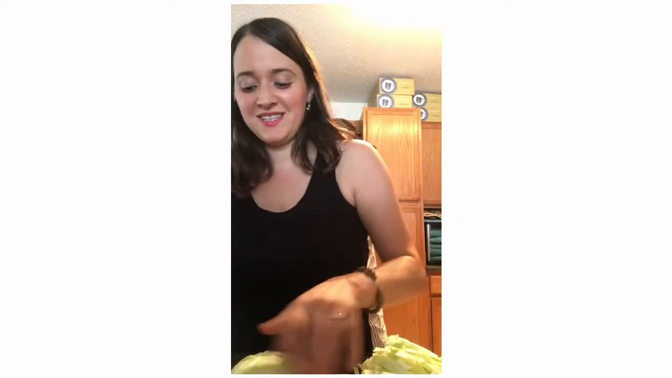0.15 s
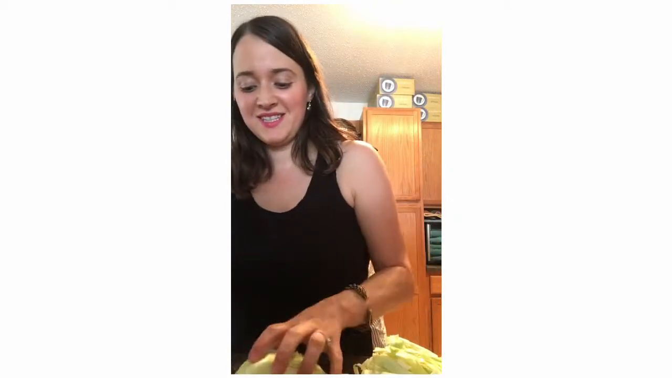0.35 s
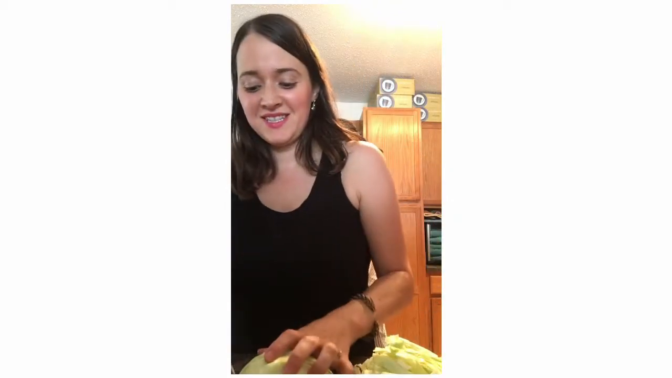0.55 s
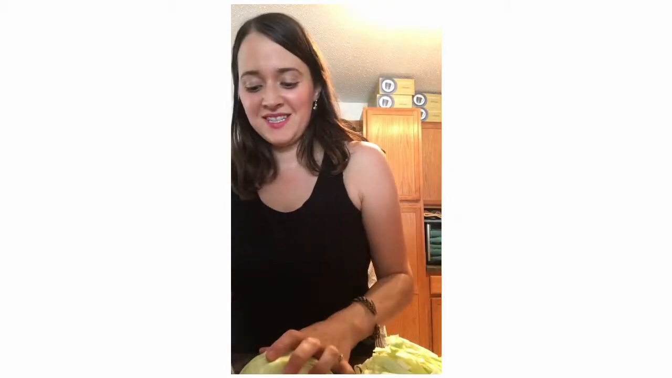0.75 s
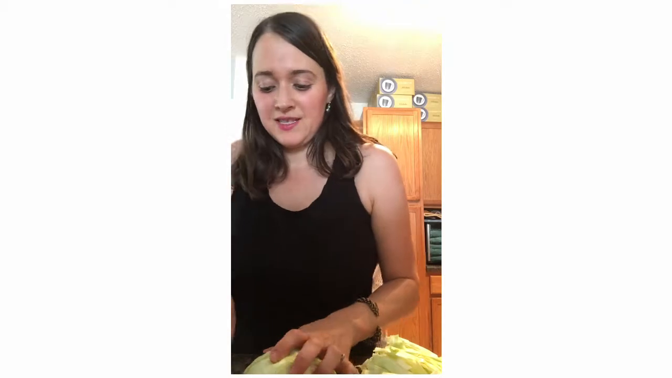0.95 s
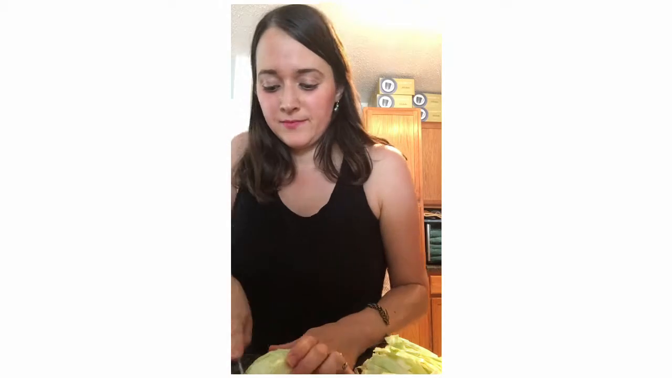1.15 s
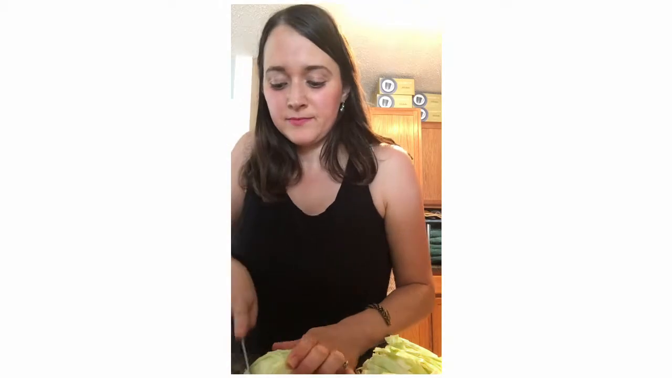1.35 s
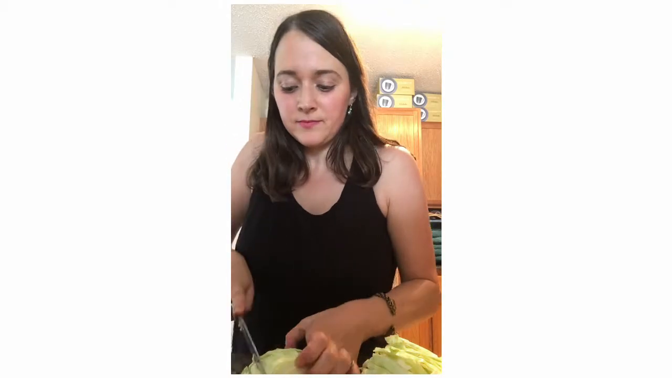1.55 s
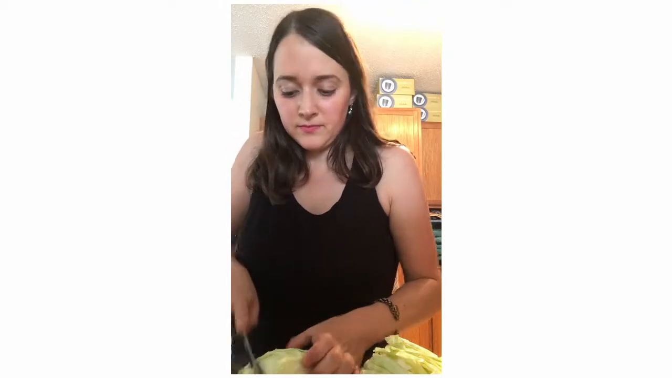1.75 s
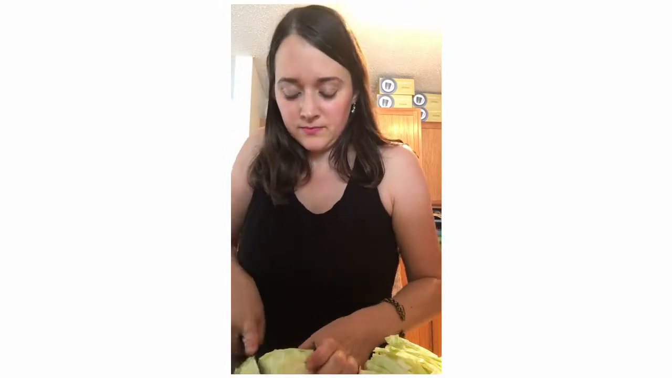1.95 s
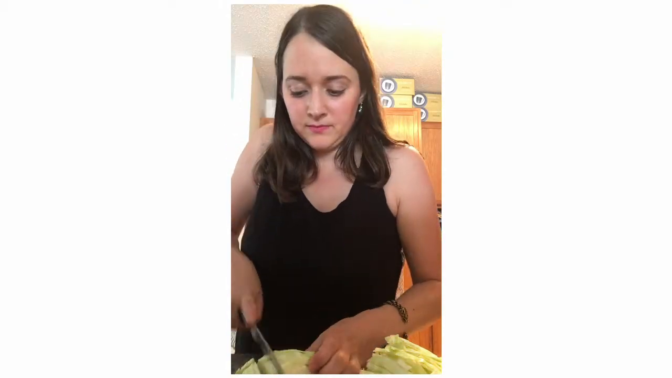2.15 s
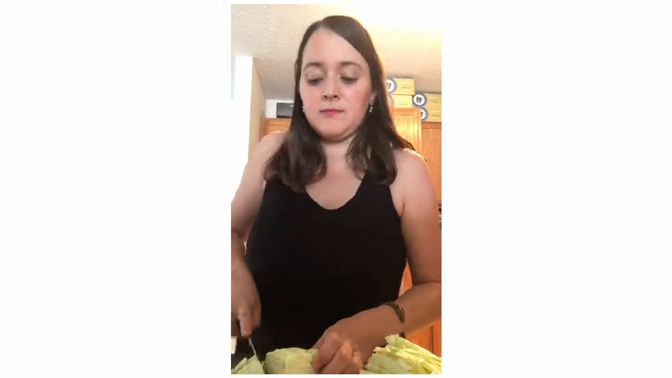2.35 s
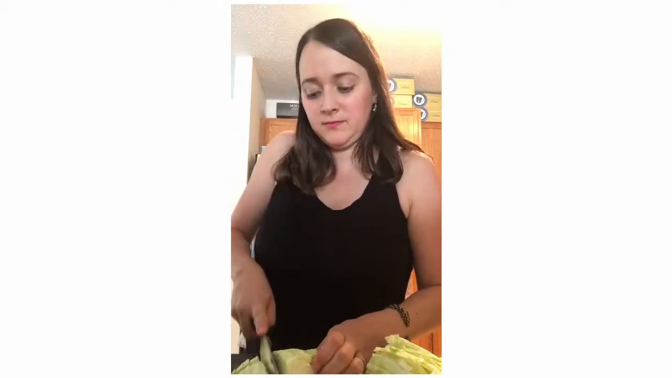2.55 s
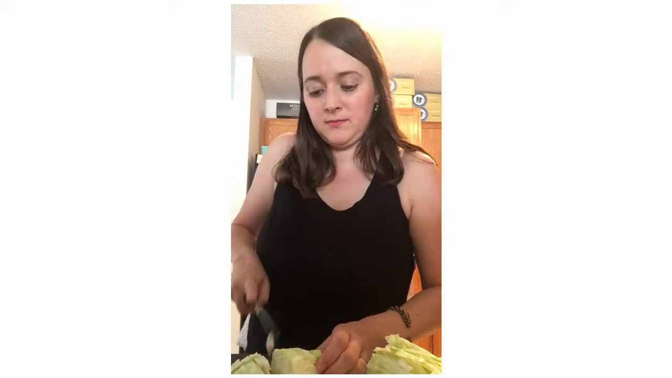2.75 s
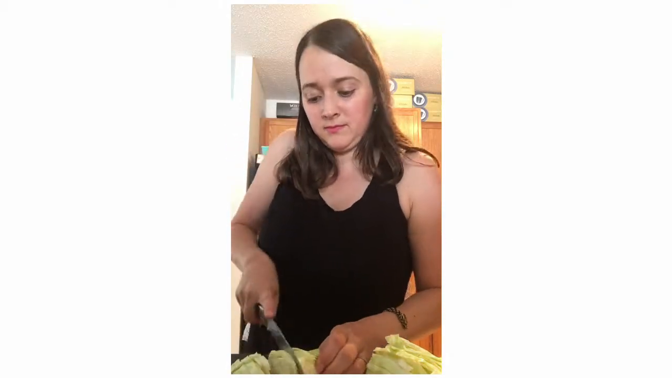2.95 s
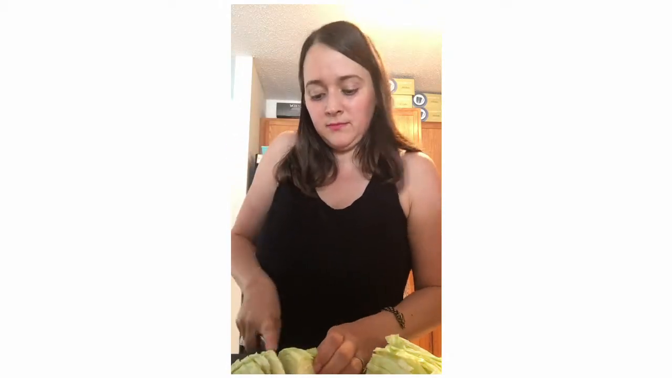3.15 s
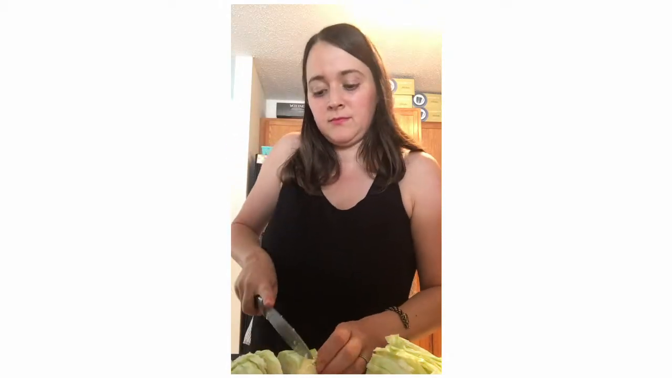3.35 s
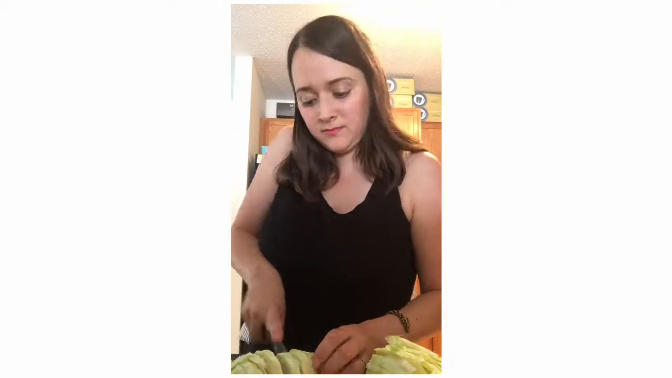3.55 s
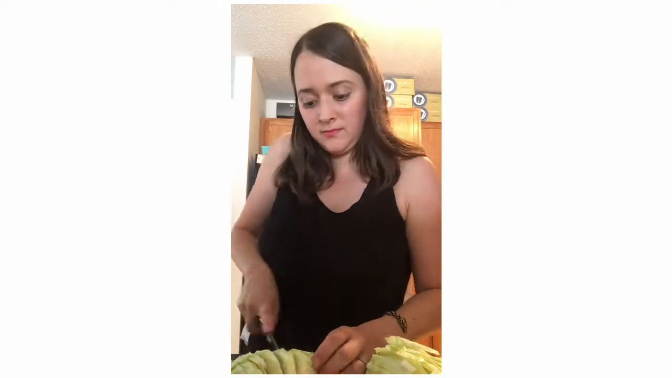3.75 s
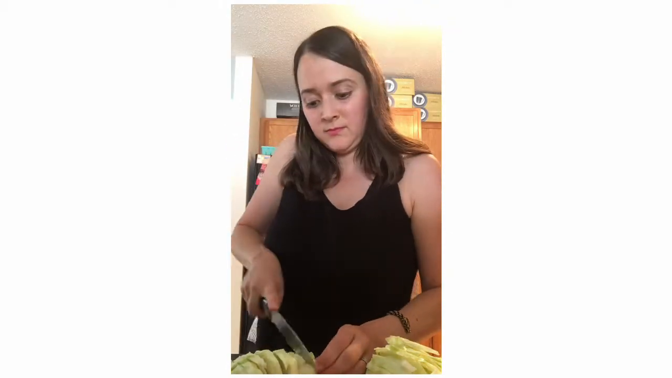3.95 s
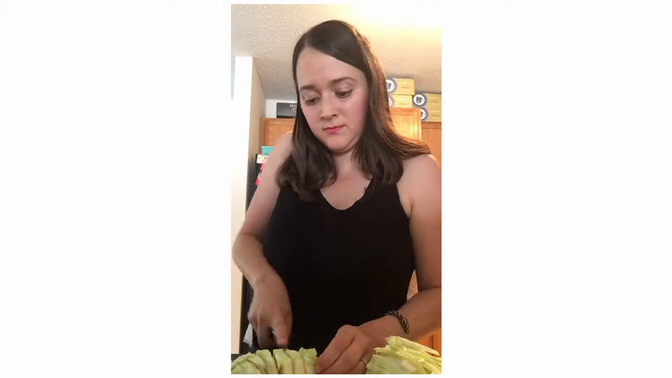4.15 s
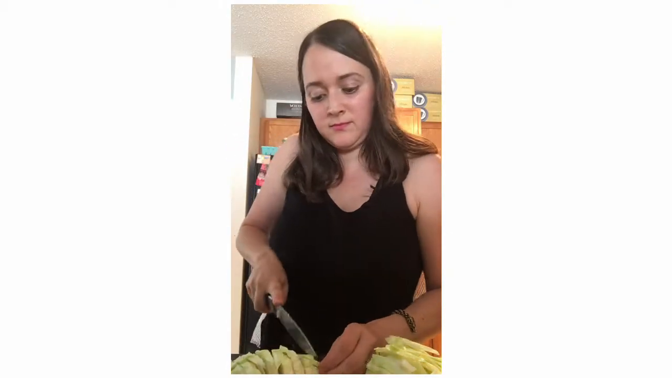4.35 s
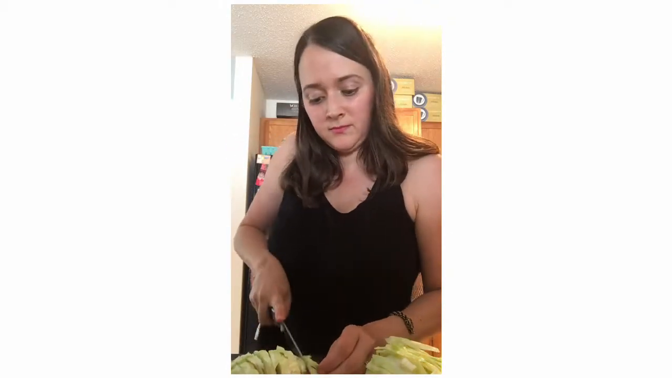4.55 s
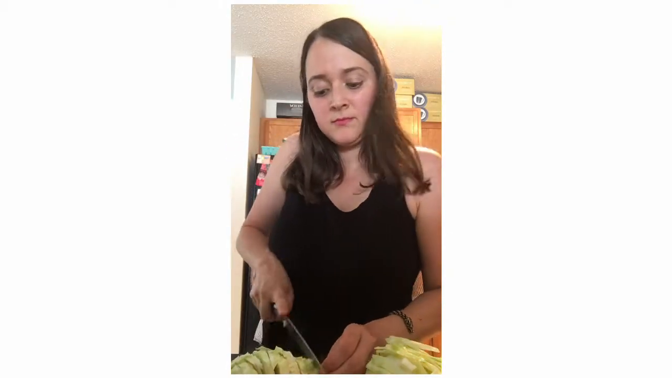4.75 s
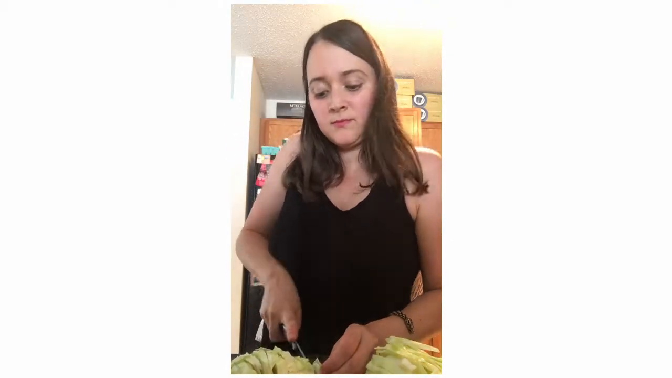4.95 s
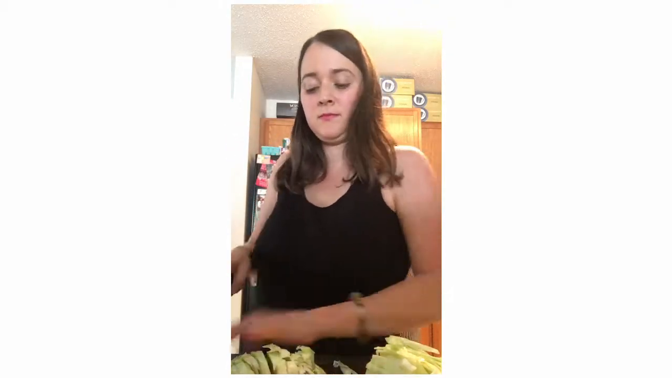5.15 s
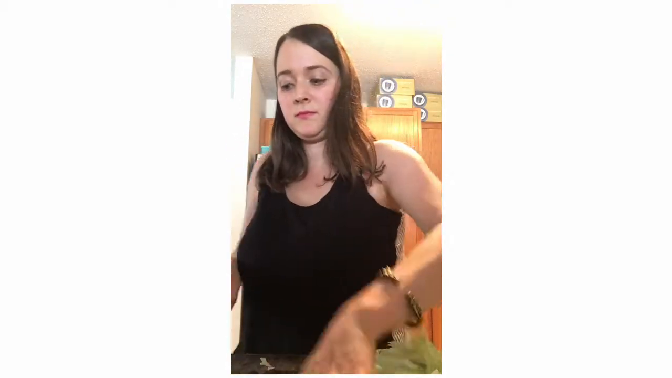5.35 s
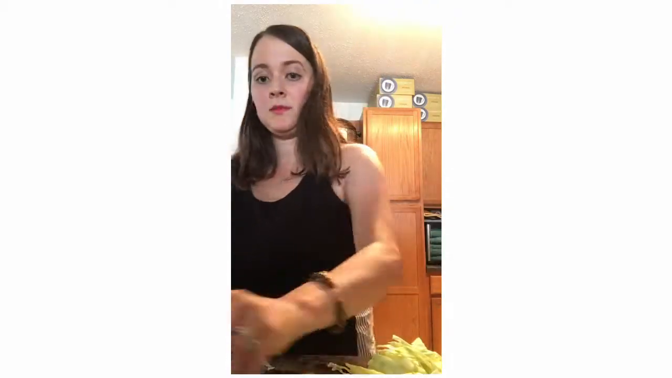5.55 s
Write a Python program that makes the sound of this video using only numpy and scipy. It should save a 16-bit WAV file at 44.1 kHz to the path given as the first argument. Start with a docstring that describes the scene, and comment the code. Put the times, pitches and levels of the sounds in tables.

```python
"""A hand settles a cabbage in a small kitchen, over a bass-heavy room noise that soon gives way to another.
Then a chef's knife slices on a wooden board: grains of noise make the leaves tear with a crunch,
and struck resonances make the blade crack on the board, which rocks on the counter.
At last the knife is laid flat and a hand sweeps the shreds aside with a noisy swish."""
import sys
import numpy as np
from scipy import signal
from scipy.fft import rfft, irfft
from scipy.io import wavfile

SR = 44100
rng = np.random.default_rng(int(sys.argv[2]) if len(sys.argv) > 2 else 0)


def dump(signal):
    """Clip the signal to [-1, 1] and save it as 16-bit WAV at the path in sys.argv[1]."""
    limited = np.clip(np.atleast_2d(signal).T, -1, 1)
    pcm = np.round(limited * 32767).astype(np.int16)
    wavfile.write(sys.argv[1], SR, pcm)


N = 247709

# All level_db columns are relative: the functions add further gains. t60_s is the time to fall 60 dB.
# In the tables of spectra, level_db is per Hz and gives only the shape.

# Room noise before and after ROOM_SWITCH_S: pitch_hz, level_db
EARLY_AIR = [(53, -21), (90, -16), (147, -5), (320, -4.5), (604, -20), (741, -20), (2330, -30), (4050, -36),
             (12000, -50.5), (15600, -58), (22000, -120)]
AIR = [(12, -63.5), (20, -22.5), (60, -40), (168, 2), (262, -10), (357, -1.5), (422, -5.5), (718, -3.5),
       (780, -7.5), (976, -7.5), (1480, -14), (1710, -21), (2750, -21), (12400, -37.5), (16000, -37)]
EARLY_AIR_DB, AIR_DB = -55, -54.5
ROOM_SWITCH_S = 0.74  # start of a short crossfade
# Narrow hum bands of an appliance: pitch_hz, width_hz, level_db
HUM_BANDS = [(186.4, 28, 0.5), (360, 14, -4), (530, 12, -7), (597, 12, -7), (717, 25, -4), (987, 28, -2.5)]
HUM_DB = -62

# Boom of the cabinet under the hand: time_s, level_db
BOOM = [(0.0, -38), (0.05, -55), (0.085, -56), (0.14, -44), (0.165, -50.5), (0.32, -54), (0.366, -46),
        (0.45, -59.5), (0.73, -56.5)]
# Palm pressing on the counter: start_s, level_db
PRESSES = [(0.107, -37), (0.123, -38), (0.338, -45), (0.355, -45)]
# Rings of the cabinet: pitch_hz, level_db, t60_s
CABINET_RINGS = [(64.3, -0.5, 0.24), (131, -14, 0.064)]
# Skin rubbing on leaves: start_s, hold_s, level_db, fall_30db_s (at least 0.003 s is used)
RUBS = [(0.0, 0.018, -48, 0.05), (0.068, 0.036, -53.5, 0.06), (0.31, .002, -66.5, 0.04),
        (0.382, 0.026, -61, 0.1), (0.435, 0.017, -67, -0.06), (0.463, 0.25, -75.5, -7)]
RUB_RISE_S = 0.063
# Spectrum of the rubbing: pitch_hz, level_db
RUB_SPECTRUM = [(470, -62), (800, -30), (1150, 2), (1340, -7), (1560, -4.5), (4250, -7.5), (9000, -24),
                (11700, -36), (19800, -120)]

# Thin faint tones: start_s, length_s, pitch_hz, level_db
TONES = [(2.314, 0.16, 1815, -64.5), (4.32, 0.046, 11050, -69), (5.195, 0.004, 4030, -52.5),
         (5.487, 0.021, 2100, -61.5)]

# Cut leaves shift and settle: start_s, hold_s, level_db, fall_30db_s (at least 0.003 s is used)
RUSTLES = [(0.752, .002, -66.5, 0.5), (0.9, 0.0055, -49.5, 0.1), (1.034, 0.0016, -62.5, 0.06),
           (1.178, 0.0042, -44, 0.06), (1.219, 0.004, -46, 0.1), (1.282, 0.05, -71, 0),
           (1.4, .005, -43, 0.14), (1.564, .002, -68, 0.5), (1.732, 0.037, -53, 0.15),
           (1.957, 0.0041, -40.5, 0.15), (2.107, 0.0017, -60, 0.3), (2.205, 0.009, -55.5, 0.2),
           (2.293, 0.069, -49.5, 0), (2.381, 0.0028, -55, 0.13), (2.457, .01, -58, 0.16),
           (2.578, 0.054, -50, 0), (2.698, .01, -59, -0.04), (2.72, .005, -48.5, .13),
           (2.786, .002, -53, -0.14), (2.833, .002, -62, 0.6), (2.961, 0.043, -51, 0.03),
           (3.015, .01, -72, 0.8), (3.075, 0.02, -54.5, 0.13), (3.1, 0.023, -58, 0.16),
           (3.212, 0.0054, -46, 0.1), (3.327, .002, -72, 1.5), (3.601, .005, -49.5, 0.1),
           (3.646, .01, -54.5, 0.27), (3.769, 0.036, -52.5, 0.09), (3.925, 0.0025, -63, 0.5),
           (4.062, 0.037, -55.5, 0.12), (4.181, 0.089, -55, 0), (4.33, .002, -76, 0.5),
           (4.53, 0.048, -57.5, -0.34), (4.574, 0.008, -53, -0.27), (4.662, 0.027, -53.5, 0.1),
           (4.788, .002, -65, 0.05), (4.916, 0.073, -57, -0.1), (4.997, 0.0042, -54.5, 0.17),
           (5.04, 0.0046, -62.5, 0.6), (5.508, .004, -51, 0.25), (5.54, .01, -57, 0.2)]
RUSTLE_RISE_S = 0.0091
LEAD_S, LEAD_DB = 0.01, -12.5  # rustle growing up to each stroke; level against the entry crunch
# Spectrum of rustling leaves: pitch_hz, level_db
LEAF_SPECTRUM = [(1180, -30.5), (2000, -4.5), (3260, -7), (9250, -3), (10000, -4), (13900, -6.5),
                 (16000, -5)]

# Board rocking on the counter between the chops: start_s, level_db
BUMPS = [(0.906, -24), (1.044, -34), (1.133, -29), (1.196, -28.5), (1.368, -26.5), (1.479, -39),
         (1.569, -32.5), (1.646, -23), (1.84, -34), (1.92, -30.5), (2.01, -29), (2.116, -28),
         (2.175, -24.5), (2.468, -26.5), (2.543, -33), (2.842, -27), (2.981, -28), (3.017, -34.5),
         (3.069, -26.5), (3.348, -36.5), (3.542, -35), (3.645, -36), (3.698, -44), (3.738, -19.5),
         (3.935, -31), (4.007, -37), (5.088, -38.5), (5.203, -45), (5.513, -32), (5.528, -35.5),
         (5.579, -30.5)]
CHOP_BUMP_DB = -19.5  # every chop bumps the board too; against its wash
# Rings of the counter, where the close pair beats: pitch_hz, level_db, t60_s
COUNTER_RINGS = [(177.2, -8, 0.091), (347, -8, 0.025), (202.2, -5, 0.11)]

# Rings of the knife laid flat on the board: pitch_hz, level_db, t60_s
FLAT_KNIFE_RINGS = [(256, 0, 0.049), (476, -3.5, 0.023), (760, -5, .045), (1520, -15, 0.037),
                    (1960, -14, 0.023), (4090, -8, 0.014), (5200, -18.5, .012), (6100, -20, .012),
                    (7600, -23, 0.012)]
LAY_DOWN_S, LAY_DOWN_DB = 5.2053, -28.5

# A hand sweeps the shreds aside: time_s, level_db
SWEEP = [(5.21, -59), (5.235, -52.5), (5.265, -47), (5.29, -54.5), (5.31, -61), (5.36, -58.5),
         (5.392, -65.5), (5.4, -66), (5.43, -75)]
# Gliding band of the swish: time_s, pitch_hz
SQUEAK_GLIDE = [(5.231, 6100), (5.25, 6600), (5.262, 7400), (5.269, 6000), (5.28, 5000)]
SQUEAK_WIDTH_HZ, SQUEAK_DB = 450, -4  # noise cutoff before it is moved up to the pitch; level
# Spectrum of the swept shreds: pitch_hz, level_db
SHRED_SPECTRUM = [(500, -37), (800, 1), (1200, -4), (1520, 1.5), (1680, -14), (2040, -6), (4220, -8.5),
                  (7020, -4.5), (16000, -19)]
# Blade flat on the board: pitch_hz, width_hz, level_db
SCRAPE_BANDS = [(2120, 198, -0.5), (1000, 430, -5), (5370, 300, -3), (9700, 500, -4)]

# The clearest leaf snaps: start_s, level_db, pitch_hz
SNAPS = [(0.0064, -25.5, 4500), (0.0066, -33, 2920), (0.031, -33, 1250), (0.0597, -34, 2170),
         (0.069, -37, 4500), (0.0803, -28, 4400), (0.11, -36, 3180), (0.166, -45, 4500), (0.181, -47, 4000),
         (0.207, -48, 6500), (0.3016, -38, 5700), (0.3426, -42, 3410), (0.352, -44, 5000),
         (0.365, -41, 3140), (0.394, -34, 1600), (0.394, -39, 3600), (0.4403, -46, 3190),
         (0.594, -48, 4500), (0.5971, -40, 5000), (0.713, -47, 1700), (0.759, -47, 7200),
         (0.798, -44, 4800), (0.808, -36, 10500), (0.824, -32.5, 3750), (0.855, -34, 7800),
         (0.8657, -28, 12000), (1.006, -44, 9000), (1.129, -24, 4900), (1.1293, -30, 10000),
         (1.161, -22, 11000), (1.226, -24, 3500), (1.238, -30.5, 7000), (1.328, -51, 11000),
         (1.3466, -43, 3470), (1.37, -28, 7600), (1.377, -21.5, 7600), (1.3945, -11, 10500),
         (1.6437, -28, 6500), (1.648, -19, 9870), (1.6484, -23, 3400), (1.6535, -27, 6500),
         (1.654, -26, 10500), (1.6598, -23, 11100), (1.6635, -24, 8000), (1.6797, -15, 10500),
         (1.7994, -42, 12800), (1.9016, -31, 11500), (1.906, -28, 11500), (1.907, -34, 6000),
         (1.9115, -34, 6500), (1.9152, -23, 7500), (1.919, -15.5, 10800), (1.9185, -19, 6500),
         (1.9335, -16, 8200), (1.939, -16, 6500), (1.943, -20, 10200), (2.071, -29, 3320),
         (2.113, -35, 9900), (2.161, -29, 3070), (2.1615, -34, 6500), (2.1775, -18, 10500),
         (2.178, -19, 3600), (2.1888, -16, 6000), (2.192, -15.5, 5200), (2.1965, -23, 6300),
         (2.2427, -20, 6500), (2.2465, -22, 5000), (2.2487, -9, 8160), (2.252, -15, 11500),
         (2.387, -38, 8300), (2.4304, -40, 9560), (2.465, -30.5, 7700), (2.4837, -29, 10500),
         (2.5097, -40, 12100), (2.5372, -24, 4780), (2.5463, -18, 4760), (2.569, -20, 6000),
         (2.636, -35, 8000), (2.6437, -19.5, 5600), (2.657, -20, 7340), (2.789, -32, 7500),
         (2.841, -30.5, 3450), (2.896, -30.5, 3520), (2.9186, -20, 6500), (2.927, -35, 5500),
         (2.9373, -22, 6500), (2.9417, -14.5, 7100), (2.9406, -18.5, 4300), (3.0155, -38, 7000),
         (3.0322, -23, 6500), (3.0325, -28, 3300), (3.0462, -15.5, 7600), (3.05, -12, 10500),
         (3.052, -15, 9500), (3.059, -17, 7600), (3.0924, -28, 10200), (3.1487, -22, 6340),
         (3.271, -38, 11900), (3.296, -37.5, 9650), (3.3298, -45, 9120), (3.3423, -40, 9430),
         (3.488, -43, 7400), (3.5057, -30.5, 7600), (3.522, -21.5, 7100), (3.529, -20.5, 9400),
         (3.5344, -22.5, 8900), (3.5613, -20, 5650), (3.5778, -13.5, 7880), (3.645, -34, 9710),
         (3.716, -42, 4550), (3.8556, -37, 3730), (3.932, -34, 5200), (3.987, -40.5, 9990),
         (4.012, -26, 12000), (4.0844, -33, 12100), (4.1308, -27, 9460), (4.222, -24.5, 8100),
         (4.441, -41, 4510), (4.257, -40, 3720), (4.461, -38.5, 12300), (4.462, -35.5, 5000),
         (4.521, -32, 8000), (4.545, -53, 3500), (4.605, -27, 8200), (4.8535, -41, 8240),
         (4.8601, -41, 9350), (4.8796, -37, 9310), (5.0593, -38.5, 7800), (5.2025, -46, 8500),
         (5.39, -36, 9200), (5.5163, -26.5, 3000), (5.516, -26, 8500), (5.5163, -29.5, 5000),
         (5.5193, -35.5, 4480), (5.542, -39.5, 7540), (5.556, -36, 9000), (5.579, -44, 7000)]
FAINT_SNAPS, FAINT_SNAP_DB = 20, -50.5  # count scattered at random; lowest level
FIRST_BREAK = 2.84  # the first sample, against the spread of the noise after it
SNAP_T60_S = 0.0093
SNAP_TAIL_DB, SNAP_TAIL_T60_S = -16.5, 0.036  # the leaf keeps tearing a little
SNAP_EDGE_DB = -19  # broadband click of a snap, before the snap's own level

# The edge breaks through a thick rib and the head thumps: start_s, level_db, pitch_hz
THUMPS = [(0.812, -39, 294), (0.824, -39, 303), (0.848, -44, 292), (1.131, -28, 254), (1.369, -22.5, 275),
          (1.371, -28, 403), (1.649, -21.5, 360), (1.661, -26, 303), (1.672, -21, 215), (1.678, -27, 232),
          (1.686, -25, 211), (1.92, -27, 270), (1.934, -39, 490), (1.941, -22, 429), (2.161, -35.5, 330),
          (2.178, -19, 391), (2.189, -20, 402), (2.243, -26, 340), (2.244, -33, 570), (2.536, -30.5, 396),
          (2.547, -34, 420), (2.569, -29.5, 265), (2.65, -33.5, 320), (2.917, -27, 285), (2.941, -27, 326),
          (2.948, -30, 301), (3.042, -33, 353), (3.143, -41, 450), (3.526, -31, 340), (3.531, -36, 608),
          (3.546, -21, 228), (3.547, -21.5, 437), (3.562, -28, 612), (3.579, -28, 420), (3.712, -40, 357),
          (4.003, -29, 298), (4.009, -31, 330), (4.136, -33.5, 598), (4.477, -40.5, 330), (4.503, -42, 430),
          (4.604, -36, 476), (4.856, -44.5, 300), (5.202, -39, 282), (5.224, -45.5, 600), (4.89, -42, 387)]
THUMP_T60_S, THUMP_RISE_S = 0.048, 0.0035  # rise is a time constant

# Blade through the leaves: start_s, length_s, first_crunch_db, last_crunch_db,
# first_thrum_db, last_thrum_db (thrum of the head), coarse_crunch_db (mean)
STROKES = [(0.81, 0.036, -53, -54, -42, -51, -60.5), (0.859, 0.032, -44, -35.5, -48, -29.5, -45),
           (1.132, 0.051, -41, -30, -37.5, -50, -45.5), (1.368, 0.037, -36, -25.5, -28, -32, -47),
           (1.65, 0.029, -48, -41, -34, -34, -48), (1.6805, 0.0145, -24, -28, -39, -38, -44),
           (1.915, 0.037, -37, -25.5, -30.5, -31, -42), (2.177, 0.026, -29, -34.5, -27.5, -39, -38),
           (2.247, 0.012, -26, -26, -25, -34, -38.5), (2.533, 0.04, -35, -37.5, -35, -39.5, -44.5),
           (2.64, 0.021, -38.5, -23, -47, -35, -44), (2.912, 0.037, -34, -40, -34.5, -35, -47),
           (3.034, 0.027, -35.5, -32, -37, -33, -41), (3.133, 0.024, -48, -27, -42, -34, -52),
           (3.523, 0.018, -46.5, -40, -36, -29, -53), (3.55, 0.049, -31.5, -31, -31, -34.5, -42),
           (3.709, 0.018, -44, -28.5, -45, -42, -43), (4.002, 0.039, -41.5, -35.5, -34, -40, -48.5),
           (4.13, 0.016, -36, -32, -38, -45, -46), (4.458, 0.056, -52.5, -43, -47.5, -46.5, -60),
           (4.605, 0.03, -33.5, -37.5, -43, -32, -47), (4.847, 0.058, -50.5, -41.5, -53, -46, -56.5),
           (4.978, 0.0045, -45, -41, -52, -50, -54)]
BITE_S, LET_GO_S, LAND_S = 0.01, 0.021, 0.0072  # 30 dB rise; 30 dB fall; fall if the edge lands on the board
COARSE_FOLLOWS = 0.87  # share of the fine crunch's swell
SPLIT_HZ = 7060  # between coarse and fine fibres
FIBRE_CYCLES = 16.8  # more cycles make a narrower fibre ring
# Spectrum of the crunch: pitch_hz, level_db
CRUNCH_SPECTRUM = [(530, -32.5), (900, -2.5), (1600, -10), (3150, -8.5), (4460, -4), (6640, -4.5),
                   (7680, -4), (8760, -4.5), (13700, -5), (16000, -8)]
# Resonances of the hollow cabbage head: pitch_hz, width_hz, level_db
HEAD_BANDS = [(185, 39, 3.5), (259, 162, -0.5), (420, 130, 0.5), (598, 143, -4), (1050, 1100, -22.5)]

# Blade on board: start_s, crack_db, low_ring_db, high_ring_db (board), knock_db, blade_ring_db, wash_db
CHOPS = [(0.885, -5.5, -23, -34, -44, -14, -11.5), (1.1698, 5, -17.5, -26, -34, -9, -8),
         (1.3982, 6.5, -17, -20, -17.5, -7, -7), (1.4761, -34, -39, -46, -43, -45, -35),
         (1.6957, 7.5, -16, -33, -28, -1.5, -6), (1.954, 7.5, -17, -26, -36, -6, -7),
         (2.2626, 4.5, -19, -15.5, -24, -27, -8.5), (2.6644, 1, -20, -15, -23, -8, -6.5),
         (3.162, 5, -22.5, -18.5, -23, -4, -7.5), (3.731, -21, -25, -23, -21, -52, -14.5),
         (4.145, 4, -20.5, -18.5, -32, -12, -9), (4.6293, -29, -25.5, -21.5, -50, -14, -16),
         (4.9834, -6.5, -27.5, -20.5, -42, -22, -15)]
BLOW_SPREAD_DB = 1.5  # random spread of each ring's strength
# Rings of the steel edge on wood: pitch_hz, level_db, t60_s
EDGE_RINGS = [(2450, -17, 0.0026), (4800, -11.5, 0.0048), (5840, 0.5, 0.0061), (7316, 3, 0.0074),
              (8680, 1.5, 0.0059), (11880, -11.5, 0.0016)]
# Low rings of the board: pitch_hz, level_db, t60_s
BOARD_LOW_RINGS = [(456, -9, 0.063), (804, -12.5, 0.1), (929, -25.5, 0.34), (1084, -26, 0.4),
                   (1113, -0.5, 0.041), (1028, -4, 0.017), (1371, -2.5, 0.024), (1560, -9, 0.018)]
# High rings of the board: pitch_hz, level_db, t60_s
BOARD_HIGH_RINGS = [(1818, -6, 0.029), (2010, -6, 0.033), (2210, -14.5, 0.07), (2560, -2, 0.0084),
                    (2698, 5.5, 0.0082), (3067, -9, 0.027)]
# Knock of the whole board: pitch_hz, level_db, t60_s
KNOCK_RINGS = [(275, -8, 0.048), (355, -7.5, 0.067), (449, -5, 0.041), (580, -3, 0.058),
               (716, -16.5, 0.019)]
# Rings of the blade: pitch_hz, level_db, t60_s
BLADE_RINGS = [(4070, -6.5, 0.045), (3730, -10.5, 0.02), (4710, -5, 0.039), (5000, -7, 0.044),
               (5900, -8, 0.09), (6050, -10, 0.07), (7700, -8.5, 0.016), (7130, -11, 0.031),
               (8950, 0, 0.028), (10050, -13, 0.048)]
# Spectrum of the crack's wash: pitch_hz, level_db
CRACK_SPECTRUM = [(180, -35), (300, -2.5), (828, -6), (1140, -1.5), (2360, -7), (2900, -6.5), (3350, -12),
                  (3900, -9), (6100, -4.5), (8640, -12.5), (9550, -15.5), (16000, -24.5)]
# Blade bands that linger in the wash: pitch_hz, width_hz, level_db
RING_TAIL_BANDS = [(1100, 60, -1.5), (2173, 61, -4), (2360, 69, -4), (3200, 110, -4), (3950, 200, -0.5),
                   (4880, 90, -4), (5200, 120, -3), (5500, 110, -2.5), (5800, 90, -1), (6120, 84, -1.5),
                   (6800, 110, -3.5), (7380, 110, -1), (8300, 180, -6.5)]
RING_TAIL_DB, RING_TAIL_T60_S = -11, 0.095  # level against the wash
TAIL_CUT_HZ = 10600

BASS_CUT_HZ = 128
OVERLOAD = 0.58  # level that loud peaks are bent towards
CUTOFF_HZ = 16984


def amp(db):
    """Turn dB into gain."""
    return 10 ** (np.asarray(db) / 20)


def unit(x):
    """Scale to an rms (average strength) of 1."""
    return x / np.sqrt(np.mean(x ** 2) + 1e-20)


def passed(x, hz, kind):
    """Keep the lows or the highs with a second-order filter."""
    return signal.sosfilt(signal.butter(2, hz, kind, fs=SR, output="sos"), x)


def bandpassed_noise(low_hz, high_hz):
    """Keep one band of steady random noise."""
    band = signal.butter(2, [low_hz, high_hz], "band", fs=SR, output="sos")
    return signal.sosfilt(band, rng.standard_normal(N))


def curve(rows, silence_db=-120):
    """Turn a table of times and levels into a gain per sample, near silent outside it."""
    s, level_db = np.transpose(rows)
    return amp(np.interp(np.arange(N) / SR, s, level_db, silence_db, silence_db))


def swell(s, hold, first_db, last_db, rise, fall):
    """Gain that climbs 30 dB to s, slides to its last level while it holds, then drops 30 dB."""
    corners = np.cumsum([s - rise, rise, max(hold, .001), max(fall, .003)])
    out = np.zeros(N)
    at = np.arange(max(round(corners[0] * SR), 0), min(round(corners[-1] * SR), N))
    out[at] = amp(np.interp(at / SR, corners, [first_db - 30, first_db, last_db, last_db - 30]))
    return out


def flutter(rate_hz, depth_db):
    """A random gain that wanders at about rate_hz."""
    return amp(depth_db * unit(passed(rng.standard_normal(N), rate_hz, "low")))


def colour(x, spectrum):
    """Filter that follows a spectrum without sounding early (minimum phase); power gain 1."""
    hz, db = np.transpose(spectrum)
    size = 8192
    bins_hz = np.arange(size // 2 + 1) * SR / size
    log_gain = np.log(amp(np.interp(np.log(bins_hz + 1), np.log(hz), db)))
    # Folding the cepstrum forward puts the response after the click
    cepstrum = irfft(log_gain)
    cepstrum[1:size // 2] *= 2
    cepstrum[size // 2 + 1:] = 0
    kernel = irfft(np.exp(rfft(cepstrum)))
    return signal.fftconvolve(x, kernel / np.linalg.norm(kernel))[:N]


def resonate(x, modes):
    """Parallel resonances of given width, signs alternating."""
    out = 0
    for k, (hz, width_hz, level_db) in enumerate(modes):
        r = np.exp(-np.pi * width_hz / SR)
        top = [(1 - r * r) / 2, 0, (r * r - 1) / 2]
        bottom = [1, -2 * r * np.cos(2 * np.pi * hz / SR), r * r]
        out = out + amp(level_db) * (-1) ** k * signal.lfilter(top, bottom, x + 1e-18)
    return out


def strike(times, dbs, modes):
    """Every blow rings all modes, each with a slightly different strength."""
    out = np.zeros(N)
    at = np.round(np.asarray(times) * SR).astype(int)
    chance = rng.standard_normal((len(at), len(modes)))
    for k, (hz, level_db, t60) in enumerate(modes):
        clicks = np.full(N, 1e-18)
        clicks[at] = amp(dbs + level_db + BLOW_SPREAD_DB * chance[:, k]) * (-1) ** k
        r = amp(-60 / (t60 * SR))
        w = 2 * np.pi * hz / SR
        out += signal.lfilter([0, np.sin(w)], [1, -2 * r * np.cos(w), r * r], clicks)
    return out


def bursts(times, dbs, t60):
    """Noise that starts at once at each time and dies away."""
    clicks = np.full(N, 1e-18)
    clicks[np.round(np.asarray(times) * SR).astype(int)] = amp(dbs)
    return rng.standard_normal(N) * signal.lfilter([1], [1, -amp(-60 / (t60 * SR))], clicks)


def grains(per_s, spread_db, hiss):
    """Random tearing clicks of uneven size over a share of plain hiss; rms 1."""
    sizes = amp(spread_db * np.minimum(rng.exponential(1, N), 2.6)) * rng.choice([-1, 1], N)
    clicks = unit(sizes * (rng.random(N) < per_s / SR))
    return unit(clicks + hiss * rng.standard_normal(N))


def fibres(tears, low_hz, high_hz, count):
    """Each sample of tearing rings one fibre, picked at random, for a few cycles at its own pitch."""
    dealt = rng.integers(0, count, N)
    pitches = np.geomspace(low_hz, high_hz, count)
    gain_db = 10 * np.log10(count)  # makes up for sharing the tears out
    return sum(resonate(tears * (dealt == k), [(hz, 2.12 * hz / FIBRE_CYCLES, gain_db)])
               for k, hz in enumerate(pitches))


def room_air():
    """Steady kitchen noise crossfades from one colour to another; an appliance then hums in narrow bands."""
    t = np.arange(N) / SR
    before = np.clip((ROOM_SWITCH_S + .002 - t) / .008, 0, 1)
    after = np.clip((t - ROOM_SWITCH_S) / .008, 0, 1)
    early = amp(EARLY_AIR_DB) * colour(rng.standard_normal(N), EARLY_AIR)
    late = amp(AIR_DB) * colour(rng.standard_normal(N), AIR)
    hum = amp(HUM_DB) * unit(resonate(rng.standard_normal(N), HUM_BANDS))
    return before * early + after * (late + hum)


def hand():
    """The cabinet booms near 65 Hz and thuds under the hand; skin rubs on leaves in fine grains."""
    boom = amp(-1.5) * curve(BOOM) * unit(bandpassed_noise(52, 76))
    thuds = passed(strike(*np.transpose(PRESSES), CABINET_RINGS), 220, "low")
    rub = sum(swell(s, hold, db, db, RUB_RISE_S, fall) for s, hold, db, fall in RUBS)
    tears = rub * flutter(90, 2.3) * grains(2000, 3.9, 0.83)
    return boom + thuds + colour(fibres(tears, 870, 12400, count=18), RUB_SPECTRUM)


def thin_tones():
    """Faint sine tones that swell and fade."""
    t = np.arange(N) / SR
    out = np.zeros(N)
    for s, length, hz, db in TONES:
        shape = np.sin(np.pi * np.clip((t - s) / length, 0, 1)) ** .5
        out += amp(db) * shape * np.sin(2 * np.pi * hz * t)
    return out


def leaf_rustle():
    """Cut leaves shift in swells of small grains, also just before each stroke as the edge settles on them."""
    level = sum(swell(s, hold, db, db, RUSTLE_RISE_S, fall) for s, hold, db, fall in RUSTLES)
    level = level + sum(swell(s, .001, db + LEAD_DB, db + LEAD_DB, LEAD_S, .005)
                        for s, _, db, *_ in STROKES)
    level = signal.lfilter([.005], [1, -.995], level)  # rounds off the swells
    tears = level * flutter(60.8, 0.72) * grains(3100, 2.4, 0.79)
    return amp(-2.0) * colour(fibres(tears, 1500, 15500, count=18), LEAF_SPECTRUM)


def board_bumps():
    """The rocking board bumps the counter; a soft contact excites mostly the lows."""
    s, db = np.transpose(BUMPS + [(chop[0], chop[-1] + CHOP_BUMP_DB) for chop in CHOPS])
    soft = np.hanning(round(0.0028 * SR))
    bumps = np.convolve(strike(s, db + 2.5, COUNTER_RINGS), soft / soft.sum())[:N]
    return passed(bumps, 180, "high")


def knife_laid_down():
    """The flat knife rings briefly over a short burst of noise."""
    ring = strike([LAY_DOWN_S], LAY_DOWN_DB, FLAT_KNIFE_RINGS)
    return ring + colour(bursts([LAY_DOWN_S], LAY_DOWN_DB - 12.5, 0.031), CRACK_SPECTRUM)


def sweep():
    """Dense small grains of shreds, scrape and leaves swell together with a gliding band of noise."""
    swish = curve(SWEEP)
    hz = np.interp(np.arange(N) / SR, *np.transpose(SQUEAK_GLIDE))
    # Slow noise times a gliding sine makes a noise band around the pitch
    slow = unit(passed(rng.standard_normal(N), SQUEAK_WIDTH_HZ, "low"))
    squeak = amp(SQUEAK_DB) * swish * slow * np.sin(2 * np.pi * np.cumsum(hz) / SR)
    shreds = colour(fibres(swish * grains(3000, 3.0, 1.1), 700, 15000, count=16), SHRED_SPECTRUM)
    scrape = amp(7.0) * resonate(swish * grains(1500, 4.0, .5), SCRAPE_BANDS)
    leaves = amp(-2) * colour(swish * grains(2000, 2.7, 1.4), LEAF_SPECTRUM)
    return squeak + shreds + scrape + leaves


def snaps():
    """Each snap is a sharp break and a few milliseconds of noise in a broad band around its pitch."""
    out = np.zeros(N + 800)
    t = np.arange(800) / SR
    decay = amp(-60 * t / SNAP_T60_S) + amp(SNAP_TAIL_DB - 60 * t / SNAP_TAIL_T60_S)
    fade = decay * np.cos(np.pi / 2 * t / t[-1])
    noise = rng.standard_normal((len(SNAPS) + FAINT_SNAPS, 800))
    noise[:, 0] = FIRST_BREAK * np.sign(noise[:, 0])
    # The faint snaps fall anywhere after the room noise switches
    faint = [(ROOM_SWITCH_S + s * (N / SR - ROOM_SWITCH_S), FAINT_SNAP_DB + 8 * db, 3500 * 3.5 ** pitch)
             for s, db, pitch in rng.random((FAINT_SNAPS, 3))]
    for (s, db, hz), burst in zip(SNAPS + faint, noise * fade):
        band = signal.butter(1, [hz * 0.81, min(hz * 1.24, 19000)], "band", fs=SR, output="sos")
        click = amp(SNAP_EDGE_DB) * passed(burst, 1000, "high")
        out[round(s * SR):][:800] += amp(db - 6.5) * (signal.sosfilt(band, burst) + click)
    return out[:N]


def thumps():
    """The head answers a breaking rib with short dull rings, each at its own pitch."""
    out = np.zeros(N)
    t = np.arange(3000) / SR
    shape = (1 - np.exp(-t / THUMP_RISE_S)) * amp(-60 * t / THUMP_T60_S)
    for s, db, hz in THUMPS:
        out[round(s * SR):][:3000] -= amp(db + 6.0) * shape * np.sin(2 * np.pi * hz * t)
    return out


def strokes():
    """Fine and coarse fibres tear in grains of their own; slips of the blade shake the hollow head of cabbage."""
    levels = np.zeros((3, N))
    for s, length, first_db, last_db, thrum_db, thrum_last_db, coarse_db in STROKES:
        half_db = COARSE_FOLLOWS * (last_db - first_db) / 2
        ends = (first_db, last_db), (thrum_db, thrum_last_db), (coarse_db - half_db, coarse_db + half_db)
        lands = any(abs(s + length - chop[0]) < .008 for chop in CHOPS)
        fall = LAND_S if lands else LET_GO_S
        levels += [swell(s, length, *end, BITE_S, fall) for end in ends]
    fine_level, thrum_level, coarse_level = levels
    fine_tears = fine_level * flutter(160, 2.8) * grains(3900, 4.0, 1.0)
    fine = passed(fibres(fine_tears, SPLIT_HZ, 15500, count=8), SPLIT_HZ, "high")
    coarse_tears = coarse_level * flutter(130, 2.46) * grains(2600, 3.6, 0.9)
    coarse = fibres(coarse_tears, 1003, SPLIT_HZ, count=16)
    crunch = colour(amp(-2.5) * fine + amp(4.0) * coarse, CRUNCH_SPECTRUM)
    head = amp(14.5) * resonate(thrum_level * grains(900, 2.5, 0.83), HEAD_BANDS)
    return crunch + head + thumps()


def chops():
    """A crack of two quick contacts, rings of board and blade, a board knock, a dying wash from the walls."""
    s, crack_db, low_db, high_db, knock_db, blade_db, wash_db = np.transpose(CHOPS)
    crack = strike(s + 0.00033, crack_db - 15.5, EDGE_RINGS)
    crack = crack + strike(s + 0.001117, crack_db - 23.0, EDGE_RINGS)
    # The walls swallow the treble of the longer tail
    tail = passed(bursts(s, wash_db - 18.0, 0.12), TAIL_CUT_HZ, "low")
    wash = colour(bursts(s + 0.00068, wash_db - 7.5, 0.02) + tail, CRACK_SPECTRUM)
    linger = resonate(bursts(s + 0.00067, wash_db + RING_TAIL_DB, RING_TAIL_T60_S), RING_TAIL_BANDS)
    board_low = strike(s + 0.002202, low_db, BOARD_LOW_RINGS)
    board_high = strike(s + .0006, high_db + 1.0, BOARD_HIGH_RINGS)
    knock = strike(s + 0.0017, knock_db - 4.0, KNOCK_RINGS)
    blade = strike(s + .0004, blade_db - 18, BLADE_RINGS)
    return crack + wash + linger + board_low + board_high + knock + blade


def scene():
    """All sources at one microphone; the board sounds lose their deep bass."""
    small_sounds = board_bumps() + thin_tones() + knife_laid_down() + leaf_rustle()
    near = passed(chops() + strokes() + small_sounds + sweep(), BASS_CUT_HZ, "high")
    return (near + snaps() + hand() + room_air())[None]


def record(dry):
    """The hardest cracks are rounded off, the microphone drops near 16 kHz, then the top is cut."""
    rounded = dry / (1 + (dry / OVERLOAD) ** 4) ** .25
    mic = signal.sosfilt(signal.cheby2(10, 22, 16100, fs=SR, output="sos"), rounded)
    return signal.sosfilt(signal.cheby2(12, 70, CUTOFF_HZ, fs=SR, output="sos"), mic)


dry = scene()
out = record(dry)
dump(out)
```